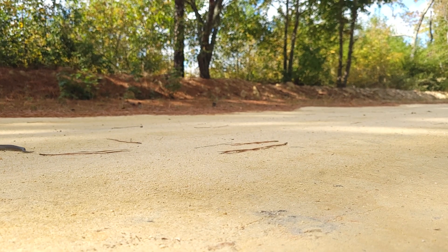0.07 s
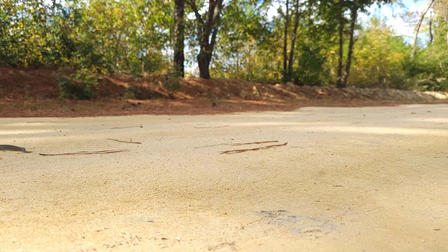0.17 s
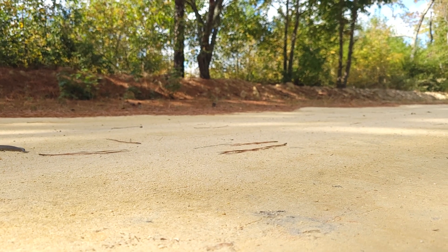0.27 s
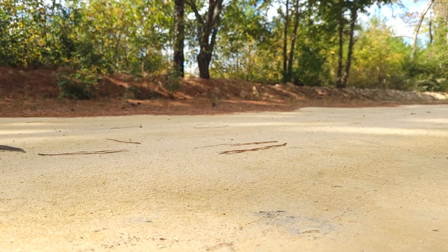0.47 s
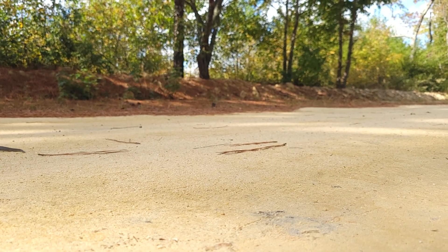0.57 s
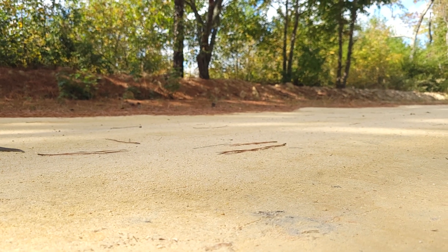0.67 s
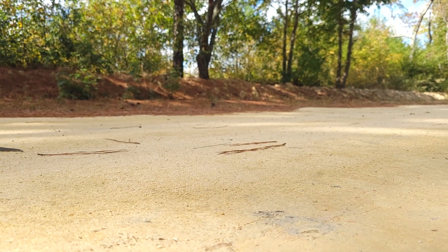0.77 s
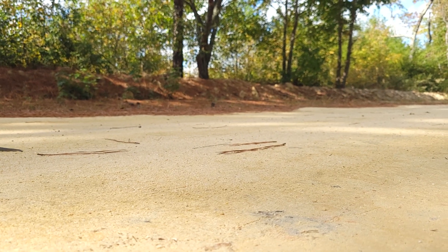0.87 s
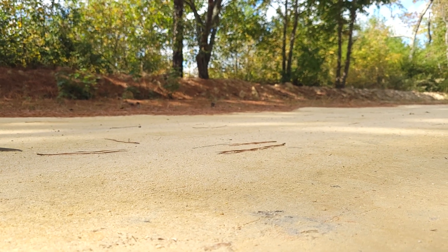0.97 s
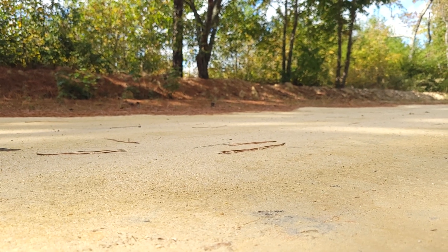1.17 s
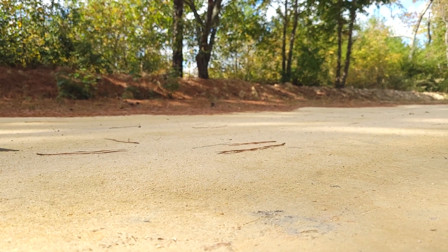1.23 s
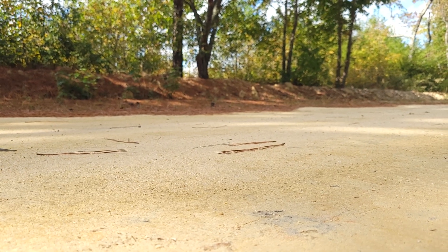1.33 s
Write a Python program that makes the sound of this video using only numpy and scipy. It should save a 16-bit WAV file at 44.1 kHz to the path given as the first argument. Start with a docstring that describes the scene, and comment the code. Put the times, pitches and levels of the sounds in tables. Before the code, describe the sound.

A snake hisses once, short and sharp, close to the microphone. A tiny scuff of sand comes just before, and the hiss ends in a dull thump. Softer low bumps follow over faint insect buzz outdoors.

```python
"""Light air rumbles on the microphone and insects buzz steadily in the trees; one chirps at the start.
A snake on a sandy track strikes close to the camera: a brief scuff of sand, then one short sharp hiss
of air forced through its throat, ending in a dull thump. Softer low bumps follow."""
import sys
import numpy as np
from scipy import signal
from scipy.fft import rfft, irfft, next_fast_len
from scipy.io import wavfile
from scipy.ndimage import map_coordinates

SR = 44100
rng = np.random.default_rng(int(sys.argv[2]) if len(sys.argv) > 2 else 0)


def materialize(psi):
    """Save the field psi as 16-bit PCM at rate SR to the path in sys.argv[1].

    A 1-D psi becomes a single channel; in a 2-D psi each row is a channel.
    """
    bounded = np.clip(np.atleast_2d(psi).T, -1, 1)
    quanta = np.round(bounded * 32767).astype(np.int16)
    wavfile.write(sys.argv[1], SR, quanta)


N = 61739


def amp(db):
    """Decibels to gain."""
    return 10 ** (np.asarray(db) / 20)


def unit(x):
    """Scale to rms 1."""
    return x / np.sqrt(np.mean(x ** 2) + 1e-20)


def along(points, hz):
    """Interpolate (Hz, value) points on a log axis."""
    f, v = np.transpose(points)
    return np.interp(np.log(hz + 1), np.log(f + 1), v)


def clock():
    """Sample times in seconds."""
    return np.arange(N) / SR


def pan(db):
    """Left and right gains for an L-R level difference."""
    return amp(np.array([[.5], [-.5]]) * db)


def ports(phase, hz):
    """Phase factors at the two microphone ports for (Hz, left lead in radians) points."""
    return np.exp(1j * np.array([[.5], [-.5]]) * along(phase, hz))


def wobble(knots_per_s):
    """Smooth random curve."""
    return map_coordinates(rng.standard_normal(int(N * knots_per_s / SR) + 4), [clock() * knots_per_s])


def filtered(x, response):
    """Apply a complex frequency response."""
    m = next_fast_len(N + SR // 2)
    return irfft(rfft(x, m) * response(np.fft.rfftfreq(m, 1 / SR)), m)[..., :N]


def noise(spectrum, correlation, balance=((1000, 0),), phase=((1000, 0),)):
    """Stereo noise of rms 1; colour and L-R relations vary with frequency."""
    m = next_fast_len(N + SR // 2)
    hz = np.fft.rfftfreq(m, 1 / SR)
    mid, side = rfft(rng.standard_normal((2, m)))
    spread = np.arccos(np.clip(along(correlation, hz), -1, 1)) / 2
    signs = np.array([[1], [-1]])
    pair = (np.cos(spread) * mid + signs * np.sin(spread) * side) * ports(phase, hz)
    coloured = pair * pan(along(balance, hz)) * amp(along(spectrum, hz))
    return unit(irfft(coloured, m)[:, :N])


# Rumble and hush spectra. Each row: frequency in Hz, relative density in dB.
RUMBLE_SPECTRUM = [(12, -26.5), (20, 1.5), (32, -7.5), (54, -1), (90, -9), (102, -22), (189, -35),
                   (265, -42.5), (300, -40.5), (390, -72), (660, -120)]
HUSH_SPECTRUM = [(100, -4), (300, -2), (600, -3.5), (1000, -13.5), (1900, -14), (2800, -17.5), (3500, -22),
                 (5400, -31), (9000, -27.5), (11000, -30.5), (13000, -26.5), (15500, -26)]
# Hush direction. Each row: frequency in Hz, L-R in dB.
HUSH_BALANCE = [(200, 0.5), (700, -0.5), (1800, 9), (2800, 6), (3600, 0), (6000, 1), (13000, -4)]
# Hush width. Each row: frequency in Hz, L-R correlation.
HUSH_CORRELATION = [(150, 1), (400, -0.31), (800, -0.39), (1400, -0.37), (2100, -0.83), (2700, -0.18),
                    (5000, -.1), (12000, -.05)]


def air(rumble_db=-53.5, rumble_pan_db=8, hush_db=-67.5):
    """Light air: low rumble on the microphone and the hush of the woods."""
    rumble = noise(RUMBLE_SPECTRUM + [(600, -80), (2000, -120)], correlation=[(60, 0.74)])
    hush = noise(HUSH_SPECTRUM, HUSH_CORRELATION, HUSH_BALANCE)
    return amp(rumble_db) * pan(rumble_pan_db) * rumble + amp(hush_db) * hush


# Insect bands. Each row: centre in Hz, width in Hz, level in dB, L-R in dB, flutter in dB.
CHORUS_BANDS = [(7286, 430, -72.5, -2.5, 0.76), (4224, 160, -84, -3, 2.5)]


def insect_choruses():
    """Many distant insects blur into narrow fluttering bands."""
    out = np.zeros((2, N))
    for centre_hz, width_hz, db, pan_db, flutter_db in CHORUS_BANDS:
        white = rng.standard_normal((2, N))
        band = filtered(white, lambda hz: (1 + ((hz - centre_hz) / (2 * width_hz)) ** 2) ** -2)
        out += pan(pan_db) * amp(db + flutter_db * wobble(knots_per_s=45.24)) * unit(band)
    return out


def insect_chirp(start_s=0.00084, count=5, strokes_per_s=71.5, pitch_hz=5245, db=-68, pan_db=7):
    """One insect: a few wing strokes on a single pitch."""
    strokes = (clock() - start_s) * strokes_per_s
    envelope = np.abs(np.sin(np.pi * np.clip(strokes, 0, count)))
    return pan(pan_db) * amp(db) * envelope * np.sin(2 * np.pi * pitch_hz * clock())


# Camera bumps. Each row: start in seconds, level in dB, first and settled pitch in Hz,
# rise and fall in seconds.
CAMERA_BUMPS = [(0.016, -41.5, 59.4, 55.3, 0.032, 0.0067), (0.1267, -31, 180, 48, 0.0023, 0.017),
                (0.2016, -29, 51, 56.2, 0.036, .016), (0.2918, -13.5, 178, 46.3, 0.006, 0.014),
                (0.32, -37.5, 38, 32, 0.015, 0.025), (.642, -44, 90, 78.4, 0.014, 0.0069),
                (0.7326, -38, 118, 93, 0.0025, 0.011), (.916, -40.5, 78.5, 74.7, 0.02, 0.01),
                (1.087, -34.5, 85, 63, 0.025, 0.0095), (1.284, -49.5, 74.6, 69, 0.013, 0.041)]


def bumps(settle_s=0.0062, decay_shape=1.12, pan_db=10):
    """Dull bumps on the camera: each swings for a few cycles as its pitch settles."""
    swings = np.zeros(N)
    for start_s, db, first_hz, settled_hz, rise_s, fall_s in CAMERA_BUMPS:
        t = np.maximum(clock() - start_s, 0)
        cycles = settled_hz * t + (first_hz - settled_hz) * settle_s * (1 - np.exp(-t / settle_s))
        attack = np.sin(np.pi / 2 * np.minimum(t / rise_s, 1))
        decay = np.exp(-(np.maximum(t - rise_s, 0) / fall_s) ** decay_shape)
        swings += amp(db) * attack * decay * np.sin(2 * np.pi * cycles)
    return pan(pan_db) * swings


# Small knocks. Each row: time in seconds, peak in dB, low-pass corner in Hz.
KNOCK_HITS = [(.093, -50, 260.5), (0.1264, -47.5, 446), (0.2959, -25.5, 330), (.646, -61, 230),
              (0.7277, -45.5, 430), (1.0857, -41.5, 640), (1.087, -43.5, 191), (1.0913, -45, 453),
              (1.282, -52, 882)]


def knocks(lag_s=.0012, lag_ref_hz=926, highpass_hz=170, pan_db=5):
    """Dull clicks at the firmer bumps; the treble arrives just before the bass."""
    out = np.zeros((2, N))
    for at_s, db, corner_hz in KNOCK_HITS:
        def response(hz):
            colour = hz ** 2 / (hz ** 2 + highpass_hz ** 2) / (1 + (hz / corner_hz) ** 2.83)
            bass_lag = np.exp(-2j * np.pi * 2 * lag_s * np.sqrt(lag_ref_hz * hz))
            return colour * bass_lag * ports([(100, 0.5), (500, -2.53)], hz)

        click = filtered(signal.unit_impulse(N, round(at_s * SR)), response)
        out += amp(db) * click / np.abs(click).max()
    return pan(pan_db) * out


# Microphone port phase, applied to the sand body and the hiss. Each row: frequency in Hz, left lead in radians.
PORT_PHASE = [(60, 7), (200, -2.33), (350, -2), (520, -3.5), (700, -2), (860, -4), (1050, -7),
              (1250, -8.5), (2000, -8), (2400, -8.5), (3000, -9), (4000, -9), (4900, -12.5), (5600, -14.5),
              (6200, -19.5), (7000, -14.5), (7900, -21), (9300, -22.5), (15000, -36)]
# Width of the sand body and hiss. Each row: frequency in Hz, L-R correlation.
SNAKE_CORRELATION = [(200, 0.88), (1000, 1), (2600, 0.89), (3600, 0.59), (4700, 1), (6500, 0.85),
                     (10000, .35)]
# Sand spectra. Each row: frequency in Hz, relative density in dB.
BODY_SPECTRUM = [(200, -8), (700, -40), (1200, -4.5), (1700, 6), (2300, -5), (3200, -43), (8000, -47)]
GRIT_SPECTRUM = [(1500, -5), (3000, -16), (3900, -4), (4900, -4), (5800, -23), (7000, -20), (9500, -28),
                 (15000, -56)]
# Scrapes. Each row: peak time in seconds, level in dB, rise and fall in seconds, grit over body in dB.
SAND_SCUFFS = [(.106, -68, .016, .012, 10), (.104, -59, .002, .003, -20), (.1178, -51, .0028, .0018, 8),
               (.1272, -42.5, .0018, .0013, -1)]


def scuffs(pan_db=4.5):
    """Quick scrapes on sand, each a dull body and a brighter grit."""
    body = noise(BODY_SPECTRUM, SNAKE_CORRELATION, phase=PORT_PHASE)
    grit = noise(GRIT_SPECTRUM, correlation=[(4000, 0.39)])
    out = np.zeros((2, N))
    for peak_s, db, rise_s, fall_s, grit_db in SAND_SCUFFS:
        t = clock() - peak_s
        envelope = np.exp(-np.abs(t) / np.where(t < 0, rise_s, fall_s))
        out += amp(db) * envelope * unit(body + amp(grit_db) * grit)
    return pan(pan_db) * out


# Throat and mouth resonances, and the thin jet above. Each row: frequency in Hz, relative density in dB.
THROAT_SPECTRUM = [(100, -7.5), (330, 2.5), (480, -7), (640, -4.5), (760, 0.5), (1000, -6.5), (1350, -5.5),
                   (1800, -0.5), (2150, -6.5), (2550, -14), (2850, -14), (3050, -23), (3400, -20.5),
                   (3950, -19.5), (4300, -11), (4600, -10.5), (4950, -18.5), (5500, -24.5), (6300, -25.5),
                   (6850, -36), (7400, -36.5), (8500, -48), (15000, -62)]
JET_SPECTRUM = [(3000, -37), (6500, 2.5), (7800, -6), (8400, -12.5), (9300, 1), (10200, -0.5), (11800, 0),
                (13500, -5), (15500, -5)]
# Hiss direction. Each row: frequency in Hz, L-R in dB.
HISS_BALANCE = [(200, 4), (400, 1), (750, -7), (1200, -7), (1900, 6), (2700, 6.5), (3400, 10.5), (3950, 0),
                (4500, 4.5), (5400, -4), (7000, 4), (8300, 26), (9500, -3.5), (15000, -2)]


def hiss(start_s=.2118, end_s=0.29225, growth_db_per_s=73.5, fall_20db_s=0.0084):
    """Air forced through the throat: sudden start, growing pressure, a last push, a quick stop."""
    throat_base_db, throat_attack_s = -32.5, .008
    jet_base_db, jet_attack_s = -64.5, 0.012
    push_at_s, push_width_s, push_peak_db = .2898, .0036, 3.5
    t = clock()
    growth_db = growth_db_per_s * (np.clip(t, start_s, end_s) - start_s)
    push_db = push_peak_db * np.exp(-((t - push_at_s) / push_width_s) ** 2)
    release_db = -20 * np.maximum(t - end_s, 0) / fall_20db_s
    opening = lambda attack_s: np.clip((t - start_s) / attack_s, 0, 1)
    throat = noise(THROAT_SPECTRUM, SNAKE_CORRELATION, HISS_BALANCE, PORT_PHASE)
    throat *= amp(throat_base_db) * np.sqrt(opening(throat_attack_s))
    jet = noise(JET_SPECTRUM, SNAKE_CORRELATION, HISS_BALANCE)
    jet *= amp(jet_base_db) * opening(jet_attack_s) ** 2
    return amp(growth_db + push_db + release_db) * (throat + jet)


def echo(x, db, t60_s):
    """Short reflections from the ground and the trees."""
    decay = amp(-60 * np.arange(SR // 2) / SR / t60_s)
    tail = rng.standard_normal((2, SR // 2)) * decay
    return amp(db) * signal.fftconvolve(x, tail / np.linalg.norm(tail[0]), axes=1)[:, :N]


def scene():
    """The snake close by, insects and air behind it."""
    snake, chirp = hiss() + scuffs(), insect_chirp()
    echoes = echo(snake, db=-32, t60_s=0.18) + echo(chirp, db=-8, t60_s=.2)
    return insect_choruses() + air() + chirp + bumps() + knocks() + snake + echoes


def record(dry, top_hz=15780):
    """The camera keeps nothing above its band limit."""
    return filtered(dry, lambda hz: hz < top_hz)


dry = scene()
out = record(dry)
materialize(out)
```